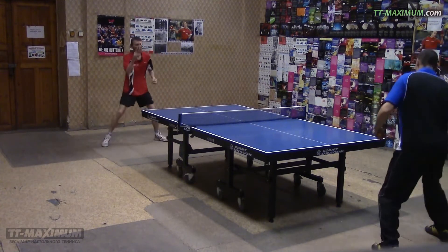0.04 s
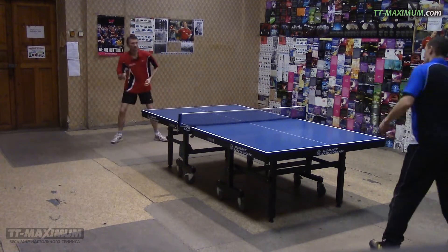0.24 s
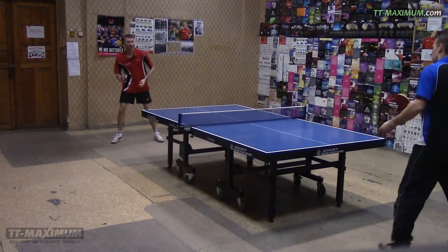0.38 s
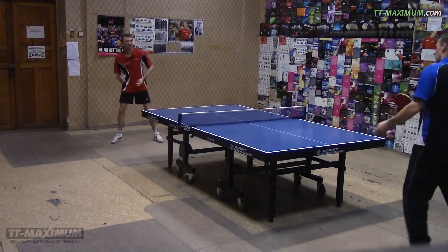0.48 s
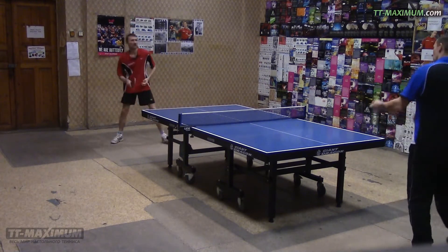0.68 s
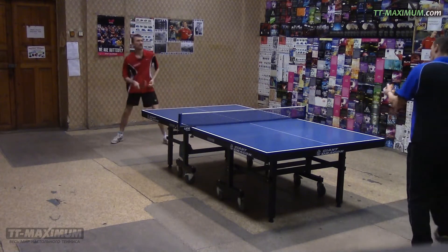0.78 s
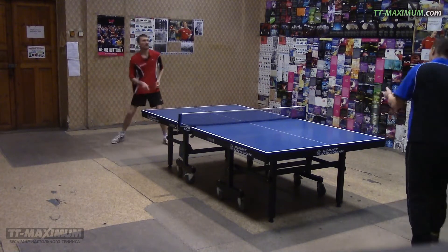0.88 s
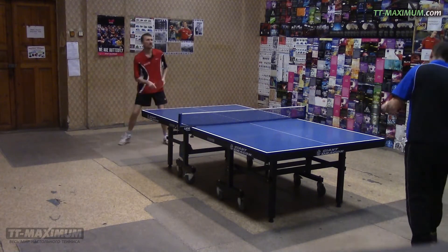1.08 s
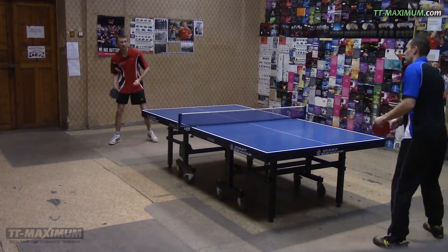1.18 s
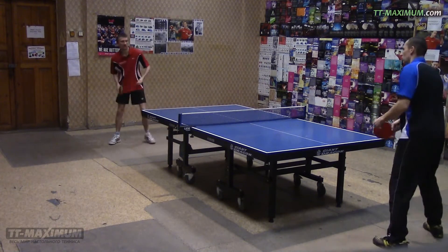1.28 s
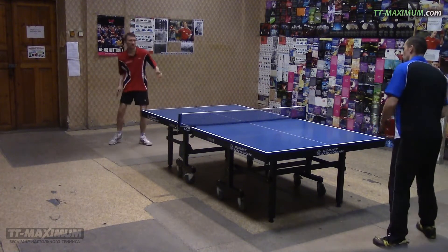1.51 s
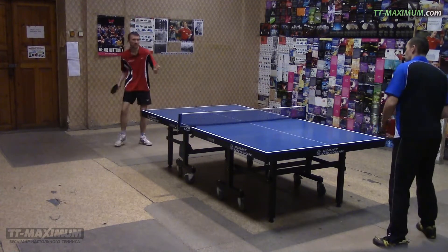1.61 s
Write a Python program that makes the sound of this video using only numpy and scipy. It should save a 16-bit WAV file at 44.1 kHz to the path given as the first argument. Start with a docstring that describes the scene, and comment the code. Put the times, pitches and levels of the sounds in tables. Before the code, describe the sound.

A table tennis ball is smacked, crashes into sheet metal, then bounces in an echoing hall.

```python
"""A panel like sheet metal crashes as a table-tennis ball hits it; its bending modes ring on, then stop
short. A bat's smack comes first. Afterwards the loose ball ticks about, is tapped by the bat and bounces
again, each impact exciting the resonances of its thin shell. The hard-walled hall reverberates, and
footfalls and faint room noise lie beneath."""
import sys
import numpy as np
from scipy import signal
from scipy.fft import rfft, irfft, next_fast_len
from scipy.io import wavfile
from scipy.ndimage import uniform_filter1d, minimum_filter1d

SR = 44100
rng = np.random.default_rng(int(sys.argv[2]) if len(sys.argv) > 2 else 0)


def int16_out(signal):
    """Quantize to a 16-bit WAV file."""
    q = np.round(np.clip(np.atleast_2d(signal).T, -1, 1) * 32767)
    wavfile.write(sys.argv[1], SR, q.astype(np.int16))


N = 72765
SHELL_BUZZ_S, SHELL_HALL_DB = 0.031, 1.5  # noise driving the ball's shell: T60, gain of its hall part


def panel():
    """Free vibration of a struck plate: a clank and a crash give way to modes that ring until damped."""
    # Spectra of the crash, the dense weak modes and the late booms. Each row: frequency in Hz, gain in dB.
    crash_spectrum = [(40, -40), (150, -14.5), (230, -2), (500, 0.5), (900, 1), (1400, -1.5), (1850, -3),
                      (2250, -11), (2800, -17.5), (3700, -19), (5000, -25.5), (7500, -29), (12000, -49),
                      (16000, -78)]
    sheet_spectrum = [(170, -38), (210, 4.5), (330, 2.5), (620, -6), (1000, -5.5), (1450, -11),
                      (2100, -25.5), (4000, -35.5), (9000, -55.5)]
    boom_spectrum = [(100, 5), (170, 3), (220, 38.5), (350, 22), (520, 25.5), (700, 25), (1000, 5),
                     (2000, 2), (8000, -37)]
    # Damping of the crash. Each row: frequency in Hz, T60 in seconds.
    crash_decay = [(250, 1.54), (1000, 1.01), (3500, 0.93), (10000, 0.59)]
    # The strongest modes. Each row: frequency in Hz, level in dB.
    panel_modes = [(207, -24.5), (236, -15.5), (301, -19), (340, -22.5), (372, -32), (443, -23), (495, -22),
                   (522, -17.5), (746, -23.5), (868, -23.5), (1011, -24), (1400, -23.5), (1441, -23.5),
                   (1760, -27)]
    # Modes of the struck spot. Each row: frequency in Hz, level in dB, T60 in seconds.
    clank_modes = [(326, -9.5, 0.072), (860, -9, 0.056), (1220, 0.5, .03), (3874, -13, 0.028)]
    # Soft booms, the last as the ring is stopped. Each row: start in seconds, level in dB.
    booms = [(.835, -1), (1.122, -13)]
    strike_s, rattle_s, stop_s, stop_fade_s = .4716, 0.098, 1.143, 0.0028
    t = clock()
    swell = lambda hz: rise(0.00067 + 0.031 / (1 + (hz / 470) ** 2))  # the bass builds up last
    decay_time = np.maximum(t - rattle_s, 0)
    rattle = lambda hz: swell(hz) * np.exp(-np.log(1000) * decay_time / curve(crash_decay, hz))
    crash = colour(by_band(rattle), crash_spectrum)
    sheet = colour(by_band(lambda hz: swell(hz) * fade(t60=2.84)), sheet_spectrum)
    modes = sum(swell(hz) * ring([(hz, db, 1.78)]) for hz, db in panel_modes)
    boom = colour(sum(amp(db) * at(burst(t60=.4), start) for start, db in booms), boom_spectrum)
    undamped = .5 - .5 * np.tanh((t - stop_s) / stop_fade_s)
    clank = ring(clank_modes) * rise(0.0026)
    ball = amp(10) * shell(burst(SHELL_BUZZ_S) + hall())
    return at(clank + ball + crash, strike_s) + undamped * (at(sheet + modes, strike_s) + boom)


def bat():
    """Impact on a hand-damped blade: a hollow pock and a crack, early reflections, then reverberation."""
    # Strokes. Each row: start in seconds, then levels of pock, crack, hall and ball shell in dB.
    strokes = [(0.1991, 0, 2.5, -1, 4), (1.2142, -13.5, -7.5, -18, 1)]
    # Modes of the blade. Each row: frequency in Hz, level in dB, T60 in seconds.
    blade_modes = [(890, -6, .05), (1036, -0.5, 0.089), (1330, -27, 0.024)]
    # Early reflections. Each row: delay in seconds, gain of pock and shell in dB, gain of crack in dB.
    echoes = [(.0093, -6.5, 8.5), (0.0118, -9, -5), (.0178, -8, 0), (.0322, -3.5, -4)]
    # Spectra of the crack and of the smack filling the hall. Each row: frequency in Hz, gain in dB.
    crack_spectrum = [(100, -19), (500, -2.5), (1500, 10), (2500, -1.5), (3800, 0), (5500, -13.5),
                      (7500, -24.5), (12000, -22.5), (16000, -32)]
    smack_spectrum = [(50, -7), (120, 6.5), (260, 26.5), (500, 31), (800, 35), (1200, 34.5), (1600, 28),
                      (2200, 19.5), (3600, 14.5), (5500, 7), (7500, 0), (12000, -8.5), (16000, -25)]
    pock_s = 0.0026
    pock = ring(blade_modes) * rise(0.00059) / (1 + (clock() / pock_s) ** 8)
    out = 0
    for start, pock_db, crack_db, hall_db, shell_db in strokes:
        crack = lambda: amp(crack_db) * colour(burst(t60=0.019), crack_spectrum)
        direct = amp(pock_db) * pock + crack()
        early = sum(at(amp(pock_db + db) * pock + amp(bright_db) * crack(), delay)
                    for delay, db, bright_db in echoes)
        buzz = burst(SHELL_BUZZ_S)
        buzz += sum(amp(db) * at(burst(SHELL_BUZZ_S), delay) for delay, db, _ in echoes)
        tail = hall()
        smack = amp(hall_db) * colour(tail, smack_spectrum)
        ping = amp(shell_db) * shell(buzz + amp(SHELL_HALL_DB) * tail)
        out += at(direct + early + smack + ping, start)
    return out


def bounces():
    """Impulsive excitation: each bounce knocks and sets ball and surface ringing, with echo and hall."""
    # Bounces, the first just before time zero. Each row: start in seconds, levels of knock, shell, hall
    # and reflection in dB, resonance of the struck spot in Hz, its level in dB.
    impacts = [(-.13, -2.5, 3, 0.5, 12, 1460, -6), (0.5118, 7, 8, -3, 1, 1810, -8),
               (.876, -7, -3, -1.5, 5.5, 3540, -45), (.898, 0, -18, -4, 1.5, 3080, -30),
               (0.919, -8, -1, -23, 0.5, 3620, -20), (.937, -14, -2.5, 0.5, 1, 3500, -44),
               (1.004, -14.5, -40, -11, 2.5, 1430, -6), (1.0342, -9, -26, 1, 9, 1390, -17),
               (1.254, -2.5, -3, -5.5, -7, 1140, -16.5), (1.3016, -2.5, 3, 1, 4.5, 1380, -15),
               (1.3365, 4, 9, -8, -10, 3240, -15), (1.3683, -3.5, -6, 1, 6.5, 1660, -15)]
    # Spectrum of a knock. Each row: frequency in Hz, gain in dB.
    knock_spectrum = [(80, -15), (400, 18.5), (750, 3), (1300, 14), (2200, 12), (2700, 7.5), (3300, 3.5),
                      (5000, -1), (7500, -10.5), (12000, -20.5), (16000, -29)]
    echo_s, spot_t60_s = 0.0073, 0.0078
    knocks, rings = 0, 0
    for start, knock_db, shell_db, hall_db, echo_db, spot_hz, spot_db in impacts:
        near = lambda t60: burst(t60) + amp(echo_db) * at(burst(t60), echo_s)
        tail = amp(hall_db) * hall()
        blow = amp(-7.5) * near(t60=0.031) + tail
        spot = resonate(blow, [(spot_hz, spot_db, spot_t60_s)])
        ping = amp(shell_db) * shell(near(SHELL_BUZZ_S) + amp(SHELL_HALL_DB) * tail)
        knocks += amp(knock_db) * at(blow, start)
        rings += at(spot + ping, start)
    return colour(knocks, knock_spectrum) + rings


def shell(drive):
    """Resonance of the ball's thin shell: each contact point weights its modes differently."""
    # Shell modes. Each row: frequency in Hz, level in dB, T60 in seconds.
    shell_modes = [(5550, -42, 0.0073), (8980, -37.5, .009), (10100, -36, 0.0044), (11340, -37.5, 0.0059),
                   (12800, -41.5, 0.0043), (13600, -51, .004)]
    detune, scatter_db = .015, 1
    draws = rng.standard_normal((len(shell_modes), 2))
    modes = [(hz * (1 + detune * pitch), db + scatter_db * level, t60)
             for (hz, db, t60), (pitch, level) in zip(shell_modes, draws)]
    return resonate(drive, modes)


def feet():
    """Impact and friction on the floor: dull footfalls and one brush of a sole."""
    # Footfalls. Each row: start in seconds, level in dB.
    footfalls = [(0.112, -0.5), (.205, 6), (0.329, 2), (0.591, 6.5), (0.871, -4), (1.129, 1.5), (1.44, 2.5),
                 (1.52, -1)]
    # Spectra of a footfall and of the brushing sole. Each row: frequency in Hz, gain in dB.
    step_spectrum = [(30, -10), (70, 6.5), (120, 14.5), (300, 12), (700, -3), (2000, -10), (8000, -29),
                     (16000, -55)]
    scuff_spectrum = [(500, -31), (3000, -33.5), (7000, -45.5), (12000, -57), (16000, -61)]
    scuff_s, scuff_width_s = 1.094, 0.044
    steps = sum(amp(db) * at(burst(t60=0.33), start) for start, db in footfalls)
    brush = np.exp(-.5 * ((clock() - scuff_s) / scuff_width_s) ** 2)
    return colour(steps, step_spectrum) + colour(noise(), scuff_spectrum) * brush


def hall():
    """Diffuse reverberation of unit energy: echoes build up, slowest in the treble, and are absorbed."""
    # Reverberation time. Each row: frequency in Hz, T60 in seconds.
    hall_decay = [(150, 0.94), (600, 0.62), (1400, 0.66), (3700, 0.68), (9000, 0.66), (15000, 0.38)]
    # Build-up of the echoes. Each row: frequency in Hz, time constant in seconds.
    build_up = [(300, 0.0084), (1000, 0.0027), (4000, 0.031), (10000, 0.021)]
    tail = by_band(lambda hz: fade(curve(hall_decay, hz)) * rise(curve(build_up, hz)))
    return at(tail / np.linalg.norm(tail[0]), start=.004)


def room_noise():
    """Stationary noise: the hall's faint background, strongest at low frequencies."""
    # Background spectrum. Each row: frequency in Hz, gain in dB.
    room_spectrum = [(20, -69), (65, -33.5), (130, -24), (300, -26.5), (700, -27.5), (1400, -35),
                     (2500, -48), (6000, -52.5), (10000, -75), (16000, -100)]
    return colour(noise(), room_spectrum)


def noise():
    """A diffuse field at two close microphones: largely coherent, less so in the treble."""
    # Stereo width. Each row: frequency in Hz, level of side relative to mid in dB.
    width = [(40, -8), (130, -36), (400, -19.5), (1200, -20.5), (2500, -17.5), (5000, -15.5), (8500, -10),
             (14000, -11.5)]
    mid, side = rng.standard_normal((2, N))
    return mid + colour(side, width) * np.array([[1], [-1]])


def burst(t60):
    """Exponentially decaying noise of about unit energy."""
    envelope = fade(t60)
    return noise() * envelope / np.linalg.norm(envelope)


def by_band(envelope):
    """Octave-band synthesis: each band of a noise follows envelope(Hz)."""
    spectrum, centres = rfft(noise()), np.geomspace(125, 16000, 8)
    hz = np.fft.rfftfreq(N, 1 / SR)
    return sum(irfft(spectrum * curve(list(zip(centres, share)), hz), N) * envelope(centre)
               for centre, share in zip(centres, np.eye(len(centres))))


def ring(modes):
    """Modal superposition: the damped sines of a struck object."""
    return sum(amp(db) * np.sin(2 * np.pi * hz * clock()) * fade(t60) for hz, db, t60 in modes)


def resonate(drive, modes):
    """Forced response: the drive convolved with the modes' impulse response."""
    return signal.fftconvolve(drive, ring(modes)[None])[:, :N]


def colour(x, points):
    """Minimum-phase filter following a table of Hz and dB, made by folding the cepstrum."""
    size = next_fast_len(N) * 2
    gain = amp(curve(points, np.fft.rfftfreq(size, 1 / SR)))
    cepstrum = irfft(np.log(gain))
    cepstrum[1:size // 2] *= 2
    cepstrum[size // 2 + 1:] = 0
    return irfft(rfft(x, size) * np.exp(rfft(cepstrum)))[..., :N]


def curve(points, hz):
    """Interpolation on a log-frequency axis."""
    frequencies, values = np.array(points, float).T
    return np.interp(np.log(np.maximum(hz, 1)), np.log(frequencies), values)


def rise(tau_s):
    """Exponential approach to full amplitude."""
    return 1 - np.exp(-clock() / tau_s)


def fade(t60):
    """Exponential decay by 60 dB in t60 seconds."""
    return np.exp(-np.log(1000) * clock() / t60)


def at(x, start):
    """Time shift by start seconds."""
    k = N - int(round(start * SR))
    return np.concatenate([0 * x, x, 0 * x], axis=-1)[..., k:k + N]


def amp(db):
    """Decibels to amplitude ratio."""
    return 10 ** (np.asarray(db) / 20)


def clock():
    """Seconds from the start."""
    return np.arange(N) / SR


def scene():
    """Superposition of bat, panel, loose ball, feet and room noise."""
    return bat() + panel() + bounces() + feet() + room_noise()


def record(dry):
    """Peak limiting holds down the loudest impacts; a low-pass filter cuts the top."""
    ceiling, window_s, top_hz = 1, .0015, 15600
    size = int(window_s * SR)
    gain = np.minimum(1, ceiling / (np.abs(dry).max(axis=0) + 1e-9))
    limited = dry * uniform_filter1d(minimum_filter1d(gain, size), size)
    return signal.sosfilt(signal.ellip(8, .2, 70, top_hz, fs=SR, output="sos"), limited)


dry = scene()
out = record(dry)
int16_out(out)
```